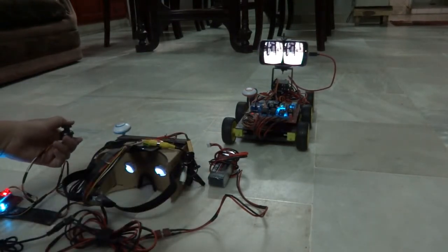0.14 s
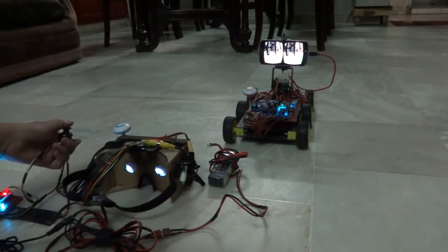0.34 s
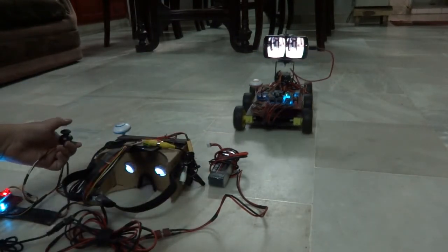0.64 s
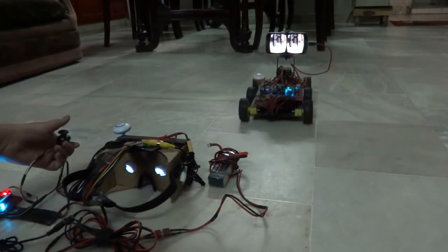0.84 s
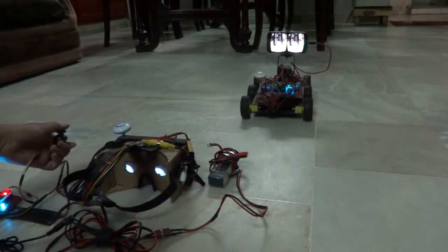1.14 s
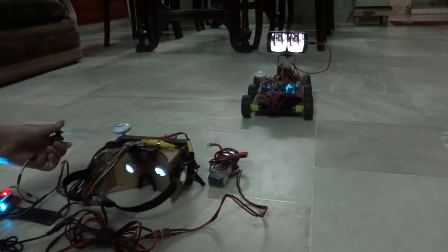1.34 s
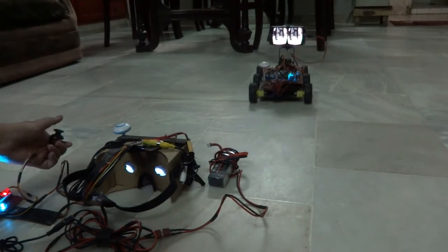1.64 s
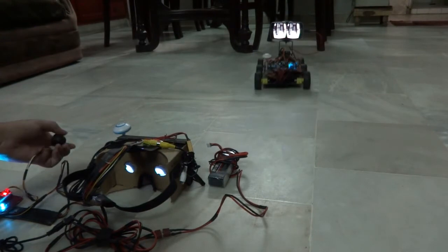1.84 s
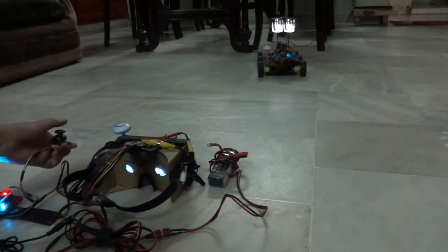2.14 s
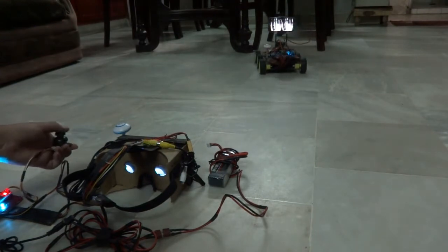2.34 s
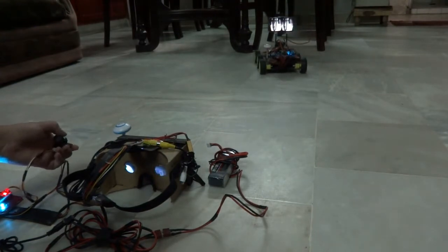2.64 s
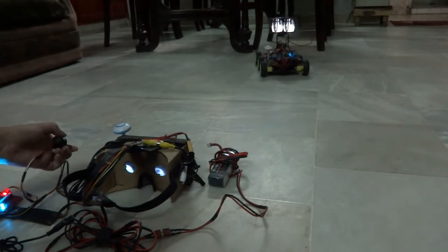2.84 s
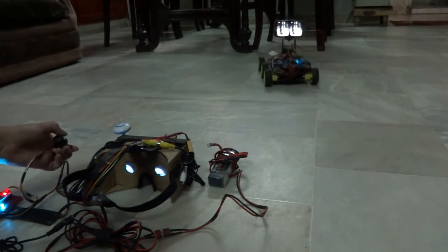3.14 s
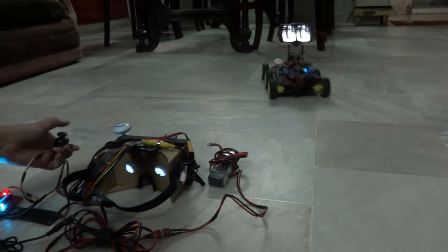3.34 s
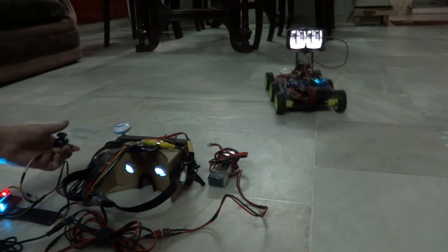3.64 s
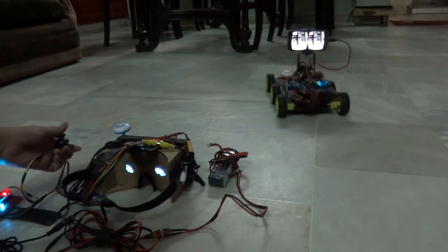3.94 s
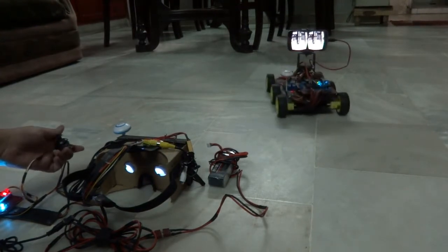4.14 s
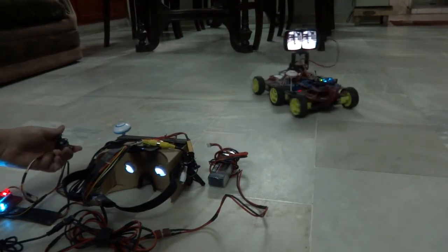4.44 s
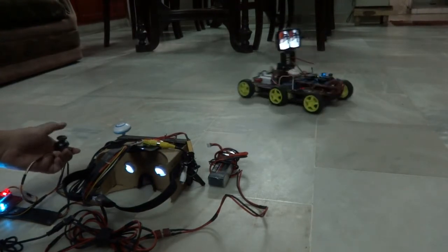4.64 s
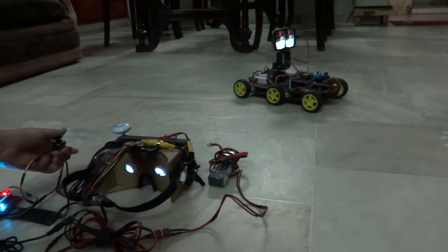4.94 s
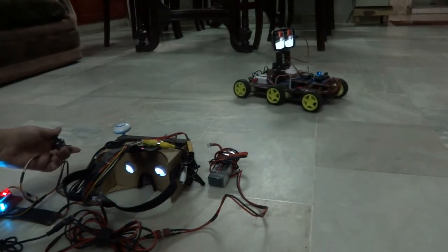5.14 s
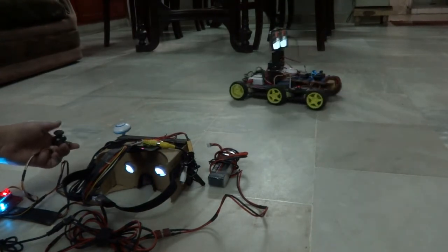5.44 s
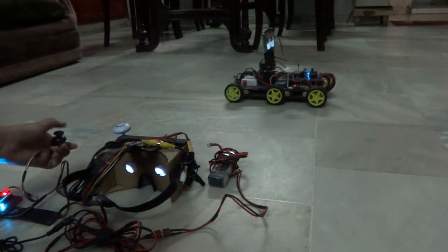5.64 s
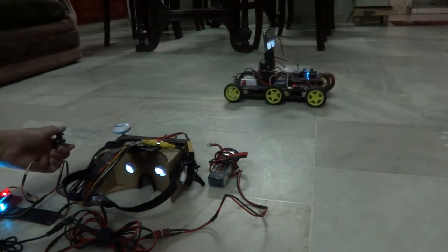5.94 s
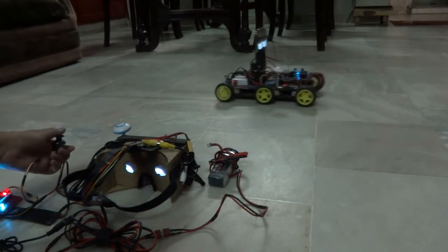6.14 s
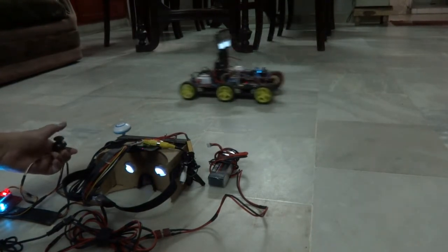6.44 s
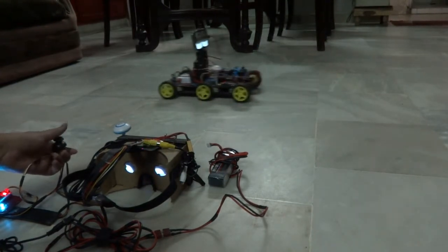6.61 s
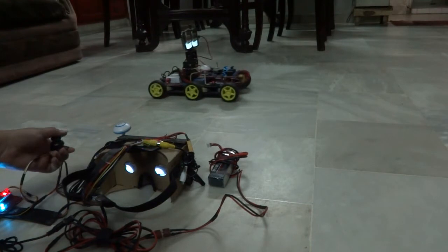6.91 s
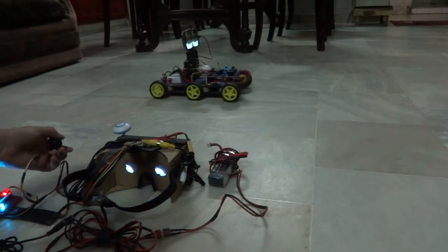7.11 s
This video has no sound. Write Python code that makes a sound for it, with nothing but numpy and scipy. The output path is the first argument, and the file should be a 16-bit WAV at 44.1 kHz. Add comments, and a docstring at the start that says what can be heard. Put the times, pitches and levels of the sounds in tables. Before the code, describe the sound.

A small robot car's plastic gear motors whir and rattle in short bursts across a stone-floored room, over steady fan rush and low wind-like microphone rumble.

```python
"""A room with a stone floor: a six-wheeled hobby robot car drives in short bursts a metre or two from a phone.
Motors spin up and coast: plastic teeth are impact trains shaken through resonances, with whines at
multiples of shaft speed; brushes are coloured noise with a whistle. Ticks are ringing clicks, a servo hums.
Steady fan-like noise fills the room; a draught buffets the microphone as low noise and short swings."""
import sys
import numpy as np
from scipy import signal
from scipy.fft import rfft, irfft
from scipy.io import wavfile
from scipy.ndimage import uniform_filter1d

SR = 44100
rng = np.random.default_rng(int(sys.argv[2]) if len(sys.argv) > 2 else 0)


def transcribe(u):
    """Save the signal u as a 16-bit wav file named by the first command-line argument.

    u: samples, shape (n,) or (channels, n), limited to [-1, 1]; the rate is SR.
    q: integer samples, one column per channel.
    """
    v = np.clip(np.atleast_2d(u).T, -1, 1)
    q = np.round(v * 32767).astype(np.int16)
    wavfile.write(sys.argv[1], SR, q)


N = 320607
T = np.arange(N) / SR


def undb(db):
    """Decibels to gain."""
    return 10 ** (np.asarray(db) / 20)


def unit(x):
    """Scale to rms 1."""
    return x / np.sqrt(np.mean(x ** 2))


def noise():
    """White noise, rms near 1."""
    return rng.standard_normal(N)


def curves(table):
    """One value per sample for each column of a timed table."""
    time_s, *columns = np.transpose(table)
    return [np.interp(T, time_s, column) for column in columns]


def colour(x, points):
    """Filter by a spectrum in dB, interpolated over log frequency; rms 1."""
    point_hz, point_db = np.transpose(points)
    bin_hz = np.maximum(np.fft.rfftfreq(N, 1 / SR), 1)
    gain = undb(np.interp(np.log(bin_hz), np.log(point_hz), point_db))
    return unit(irfft(rfft(x) * gain, N))


def resonate(x, hz, width_hz):
    """Two-pole resonance, gain 1 at the centre."""
    b, a = signal.iirpeak(min(hz, SR / 2 - 1), hz / width_hz, fs=SR)
    return signal.lfilter(b, a, x)


def resonate_twice(x, hz, width_hz):
    """Two equal resonances in series: steeper skirts, slower onset."""
    return resonate(resonate(x, hz, width_hz), hz, width_hz)


def lowpass(x, order, hz):
    """Butterworth low-pass."""
    return signal.sosfilt(signal.butter(order, hz, fs=SR, output="sos"), x)


def highpass(x, order, hz):
    """Butterworth high-pass."""
    return signal.sosfilt(signal.butter(order, hz, "high", fs=SR, output="sos"), x)


def lag(x, seconds):
    """Follow x with a first-order delay."""
    k = 1 - np.exp(-1 / (seconds * SR))
    return signal.lfilter([k], [1, k - 1], x)


def walk(steps_per_s):
    """Smooth random wander, rms 1."""
    k = int(SR / steps_per_s)
    steps = np.repeat(rng.standard_normal(N // k + 1), k)
    return unit(uniform_filter1d(uniform_filter1d(steps, k), k)[:N])


def stereo(mid, side):
    """Left and right from mid and side."""
    return np.array([mid + side, mid - side])


def rush():
    """Broadband air noise plus noise-driven broad resonances."""
    # hz, level_db per Hz (before the high-pass)
    air_spectrum = [(18, -34), (30, 12), (124, -8.5), (393, -10), (425, -6.5), (460, -11.5), (582, -12),
                    (647, -15), (841, -8.5), (1150, -14.5), (1350, -12), (1460, -16), (3380, -25.5),
                    (5010, -38.5), (15900, -67)]
    # hz, width_hz, level_db
    air_peaks = [(353, 30, -40.5), (418, 163, -38.5), (801, 54, -40), (845, 27, -43), (913, 66, -39.5),
                 (1270, 180, -43.5)]
    air = unit(highpass(colour(noise(), air_spectrum), 2, 240))
    peaks = 0
    for hz, width_hz, db in air_peaks:
        # two passes narrow the band, so each is wider
        peaks = peaks + undb(db) * unit(resonate_twice(noise(), hz, 1.7 * width_hz))
    return undb(-31.0) * air + undb(-1.5) * peaks


def fan(side_db=-16.0, hum_db=-39.5):
    """Steady fan-like rush, weaker in the side signal, over a low noisy hum common to both channels."""
    mid = rush() * undb(.5 * walk(7.1))
    hum = undb(hum_db) * unit(resonate(noise(), hz=94, width_hz=36))
    return stereo(mid, undb(side_db) * rush()) + hum


def eddies(cycles=1.0, scatter_s=0.00878, rise_s=.013):
    """Each buffet is a short cluster of low swings around its centre pitch and an octave or so either side."""
    # start_s, level_db, centre_hz
    buffets = [(0.092, -15, 121), (0.338, -18, 123), (0.392, -21.5, 130), (0.648, -23.5, 156),
               (0.885, -25.5, 123), (0.96, -17.5, 153), (1.156, -26, 183), (1.24, -25, 120.8),
               (1.394, -24.5, 238), (1.764, -24, 122), (1.799, -22, 139), (2.273, -24, 155),
               (2.503, -20, 250), (2.965, -15, 121), (3.139, -20, 140.7), (3.239, -21, 133),
               (3.329, -22.5, 120.7), (3.885, -17.5, 167), (3.939, -19, 156), (4.113, -25, 146),
               (4.738, -23.5, 151.4), (4.821, -20, 121.2), (4.909, -20, 124.4), (5.372, -20, 143),
               (5.647, -20, 170.5), (5.952, -19, 137.3), (6.576, -22, 134.7), (6.751, -19, 124),
               (6.849, -24, 126), (6.899, -19, 130), (7.122, -21, 156.1)]
    # pitch ratio, gain
    swings = [(.4, 0.37), (.6, 0.51), (.85, 1), (1.2, 0.76), (1.6, 0.79), (2.1, 1)]
    out = np.zeros(N + SR)
    t = np.arange(-SR // 12, SR // 12) / SR
    for start_s, db, hz in buffets:
        thump = 0
        for ratio, gain in swings:
            age_cycles = (t - scatter_s * rng.standard_normal()) * hz * ratio
            swing = np.cos(2 * np.pi * (age_cycles + rng.random()))
            thump = thump + gain * np.exp(-(age_cycles / cycles) ** 2) * swing
        i = max(int((start_s + rise_s + t[0]) * SR), 0)
        out[i:i + len(t)] += undb(db) * thump / np.abs(thump).max()
    return out[:N]


def draught(gust_db=-3.5, buffet_db=3.5, gust_side_db=-3, buffet_side_db=2, wander_db=3.5):
    """Air rumbles on the microphone ports; large eddies reach both alike, small ones differ."""
    # time_s, level_db
    wind = [(0, -35), (1.28, -31.5), (1.52, -37.5), (1.8, -38), (2.05, -41), (2.38, -43), (2.6, -32.5),
            (2.85, -35), (3.2, -25.5), (3.6, -32), (3.92, -31.5), (4.25, -36.5), (4.85, -31), (5.1, -42),
            (5.35, -33), (6.5, -37), (6.88, -28), (7.27, -34)]
    # hz, level_db per Hz
    large_spectrum = [(18, -72), (30, 2.5), (55, -2.5), (110, -1.5), (170, -2), (260, -12.5), (400, -21),
                      (800, -69.5)]
    small_spectrum = [(25, -2), (70, 15.5), (140, 20.0), (260, 12.5), (380, 9.5), (700, -78)]
    (wind_db,) = curves(wind)
    gust = undb(wind_db + gust_db + wander_db * walk(25))
    large = colour(noise(), large_spectrum)
    small = colour(noise(), small_spectrum)
    mid = gust * large + undb(buffet_db) * eddies()
    side = undb(gust_side_db) * gust * small + undb(buffet_side_db) * highpass(eddies(), 1, 120)
    return stereo(mid, side)


def drive(unload_s=0.067, head_start_s=.034):
    """Powered shafts close in on full speed, straining less; let go, friction slows them evenly to a stop."""
    # one row per joystick push: start_s, held_s, full_shaft_hz, spin_up_s (time constant),
    # coast_s (from full speed), level_db, load_groan_db, brush_spark_db
    runs = [(.305, .325, 181, .11, .52, -0.15, -1.5, 0.5), (1.303, 0.57, 179, .077, .38, -1, 0, -.6),
            (1.98, .11, 178.8, 0.079, 0.39, -4, -1, -3.5), (2.603, .735, 173.7, 0.069, .95, -2, -2.2, -0.9),
            (4.212, 0.43, 173.1, 0.076, 0.26, -1.2, 1.5, 0.9),
            (5.264, .27, 177, .088, 0.22, 0.64, 0.9, 1.5), (5.986, .467, 176.6, .062, .55, 0, .5, .5),
            (7.106, 0.29, 175.7, 0.08, 0.28, 1.5, 0, 1)]
    # level_db at full speed, growth_db per tenfold speed, coasting_change_db, full_strain_extra_db
    gear_law = (-25, 50, -8.5, 0)
    brush_law = (-32, 52.5, -9.5, -8)
    groan_law = (-30.5, 38, -1, 14.5)
    pace, full_hz, level_db, load_db, spark_db, coasting = np.zeros((6, N))
    for start_s, held_s, hz, spin_s, coast_s, db, load, spark in runs:
        i = int(start_s * SR)
        age_s = T[i:] - T[i]
        pushed_s = np.minimum(age_s, held_s)
        let_go_s = np.maximum(age_s - held_s, 0)
        # slack in the gears gives the shafts a head start
        rise = 1 - (1 - pace[i]) * np.exp(-(pushed_s + head_start_s) / spin_s)
        pace[i:] = rise * np.maximum(1 - let_go_s / coast_s, 0)
        # the teeth lose their load when the power is cut
        coasting[i:] = 1 - np.exp(-let_go_s / unload_s)
        full_hz[i:], level_db[i:], load_db[i:], spark_db[i:] = hz, db, load, spark
    pace = np.maximum(pace, .01)
    strain = (1 - pace) * (1 - coasting)

    def law_db(law):
        full_db, growth_db, coasting_db, strain_db = law
        return level_db + full_db + growth_db * np.log10(pace) + coasting_db * coasting + strain_db * strain

    speed_hz = np.maximum(pace * full_hz, 10)
    return speed_hz, law_db(gear_law), law_db(brush_law) + spark_db, law_db(groan_law) + load_db


def impacts(cycles, slack_cycles, scatter_db):
    """A click of random size near each whole cycle, early or late by the slack, shared between two samples."""
    beats = np.arange(np.ceil(cycles[-1]))
    timing, strength = rng.standard_normal((2, len(beats)))
    at = np.interp(beats + slack_cycles * timing, cycles, np.arange(N))
    size = undb(scatter_db * np.clip(strength, -2, 2))
    i, late = at.astype(int), at % 1
    first = np.bincount(i, size * (1 - late), N + 1)
    second = np.bincount(i + 1, size * late, N + 1)
    return (first + second)[:N]


def gears(speed_hz, wobble=.009, backlash=0.11, loose_db=2, runout=0.22, pinion_teeth=8):
    """Pinion teeth strike in step with each shaft; the slack gears behind them clatter out of step."""
    # six rows: speed ratio to the first motor, level_db
    motors = [(1, 9.5), (1.018, -13), (.875, 8.5), (.975, -2), (0.84, -3), (.83, -2)]
    mesh, clatter = 0, 0
    for ratio, db in motors:
        turns = np.cumsum(speed_hz * ratio * (1 + wobble * walk(30))) / SR
        # an off-centre pinion presses harder once a turn
        press = undb(db) * (1 + runout * np.sin(2 * np.pi * turns))
        mesh = mesh + press * impacts(pinion_teeth * turns, backlash, scatter_db=2.5)
        clatter = clatter + press * impacts(pinion_teeth * turns, slack_cycles=2, scatter_db=5.5)
    teeth = highpass(unit(mesh) + undb(loose_db) * unit(clatter), 2, 400)
    # slower teeth come more seldom, so each carries more of the level
    return unit(teeth / np.sqrt(np.maximum(speed_hz / speed_hz.max(), .25)))


def whine(speed_hz, order, width_hz):
    """A line at a multiple of the shaft speed, blurred by uneven running."""
    phase = 2 * np.pi * order * np.cumsum(speed_hz) / SR
    return walk(width_hz) * np.cos(phase) + walk(width_hz) * np.sin(phase)


def gear_rattle(teeth, speed_hz, flat_out, box_db=1.26):
    """Tooth impacts ring gearbox and chassis; mesh whines emerge with speed."""
    # hz, width_hz, level_db
    resonances = [(2493, 220, 0.5), (3006, 145, 1.5), (3237, 364, 0.5), (3970, 330, -0.5), (4305, 395, -1),
                  (4896, 470, -1.5), (6940, 2060, -16)]
    # multiple of shaft speed, width_hz, level_db
    mesh_lines = [(14.25, 75, -10.5), (16.4, 100, -7), (18.7, 110, -18)]
    box, sign = 0, 1
    for hz, width_hz, db in resonances:
        box = box + sign * undb(db) * resonate(teeth, hz, width_hz)
        sign = -sign  # neighbours in opposite polarity
    mesh_whine = sum(undb(db) * whine(speed_hz, order, width_hz) for order, width_hz, db in mesh_lines)
    return undb(box_db) * unit(box) + flat_out * mesh_whine


def load_groan(speed_hz, teeth_db=0.5, labour_db=-4.5, lag_s=.06):
    """Loose teeth groan; the most heavily loaded motor gathers speed late, a rough whine behind the others."""
    # hz, level_db per Hz
    groan_spectrum = [(500, -7), (900, 3.5), (1250, 7), (1600, 4), (2000, 5.5), (2400, -8.5), (2900, 3),
                      (4500, -15)]
    labour = undb(labour_db) * whine(lag(speed_hz, lag_s), order=13, width_hz=260)
    return undb(teeth_db) * colour(gears(speed_hz, loose_db=11.0), groan_spectrum) + labour


def brush_noise(teeth, speed_hz, flat_out, hiss_db=2.0, commutations=6):
    """Brushes spark at each commutator gap: hiss, and a whistle on high multiples of that rate."""
    # hz, level_db per Hz
    hiss_spectrum = [(3000, -27), (5000, 4), (6000, 0), (7200, -0.5), (8500, -0.5), (9700, -2.5),
                     (11000, -7), (12700, -5), (14000, -4), (15500, -3.5)]
    # multiple of commutation rate, level_db
    whistle_lines = [(11, -15.5), (12, -13), (13, -18), (14, -17)]
    sparks = unit(teeth) + undb(11) * noise()
    whistle = sum(undb(db) * whine(speed_hz, commutations * k, width_hz=90) for k, db in whistle_lines)
    return undb(hiss_db) * colour(sparks, hiss_spectrum) + flat_out * whistle


def car():
    """Gear rattle, load groan and brush noise, each at its own level law of speed, load and coasting."""
    speed_hz, gear_db, brush_db, groan_db = drive()
    flat_out = (speed_hz / speed_hz.max()) ** 4
    teeth = gears(speed_hz)
    rattle = undb(gear_db) * gear_rattle(teeth, speed_hz, flat_out)
    groan = undb(groan_db) * load_groan(speed_hz)
    brushes = undb(brush_db) * brush_noise(teeth, speed_hz, flat_out)
    # the drive's loudness wavers quickly and slightly at random
    waver = undb(1.3 * walk(75))
    return waver * (rattle + groan + brushes)


def ticks(crack=.045, gain_db=1):
    """Hard plastic snaps: a crack and a ring of a few cycles."""
    # start_s, level_db, centre_hz, width_hz (of each of two passes)
    snaps = [(2.5349, -29, 6820, 4500), (3.565, -21, 4520, 2000), (3.629, -17, 4750, 1400),
             (3.7035, -13, 4370, 1600), (3.73, -18, 6010, 6010), (3.796, -19.5, 4460, 3520),
             (4.1366, -13, 5600, 4850), (5.189, -30, 7030, 5000), (6.743, -23, 7080, 6000),
             (6.854, -25.5, 6140, 6040)]
    out, push = np.zeros(N), signal.unit_impulse(512)
    for start_s, db, hz, width_hz in snaps:
        ring = resonate_twice(push, hz, width_hz)
        i = int(start_s * SR)
        out[i:i + len(push)] += undb(db + gain_db) * (ring / np.abs(ring).max() + crack * push)
    return out


def servo(hz=608):
    """A faint, slightly unsteady sine, likely the servo that swivels the camera mast."""
    # time_s, level_db
    servo_level = [(5.8, -80), (5.95, -43), (6.55, -41.5), (6.7, -78)]
    (level_db,) = curves(servo_level)
    cycles = np.cumsum(hz * (1 + 0.0089 * walk(20))) / SR
    return undb(level_db + 2 * walk(15)) * unit(np.sin(2 * np.pi * cycles))


def room(x, t60_s=0.59, direct_db=-2.27, wet_db=-5, side_db=-10.0, pan_db=-1.0, count=6):
    """Floor and walls ring on; the echo pattern keeps changing as the car moves, nearly alike at both ports."""
    t = T[:SR // 2]
    mid, side = 0, 0
    place = T / .03  # crossfade to the next echo pattern every 30 ms, in a cycle
    for k in range(count):
        share = np.maximum(1 - np.abs((place - k + 1) % count - 1), 0)
        tails = rng.standard_normal((2, len(t))) * undb(-60 * t / t60_s) * (t > .004)
        near, far = (signal.oaconvolve(x * share, h / np.linalg.norm(h))[:N] for h in tails)
        mid, side = mid + near, side + far
    mid = undb(direct_db) * x + undb(wet_db) * lowpass(mid, 1, 15000)
    side = undb(wet_db + side_db) * lowpass(side, 3, 6500)
    pan = undb(np.array([[pan_db], [-pan_db]]) / 2)
    return stereo(mid, side) * pan


def scene(hiss_db=-66, gain_db=0.31):
    """The car in the room, over fan noise, draught and the microphone's own faint hiss."""
    background = fan() + draught() + undb(hiss_db) * noise()
    return undb(gain_db) * (background + room(car() + ticks() + servo()))


def record(dry, duck_db=-20, duck_s=0.015, top_hz=15750):
    """The phone turns its gain down for a moment when the bass surges, and cuts the deepest bass and the top."""
    bass = lowpass(dry.mean(axis=0), 2, 300)
    ducked = dry / np.sqrt(1 + lag(bass ** 2, duck_s) / undb(duck_db) ** 2)
    top_cut = signal.ellip(10, .2, 70, top_hz, fs=SR, output="sos")
    return signal.sosfilt(top_cut, highpass(ducked, 2, 20))


dry = scene()
out = record(dry)
transcribe(out)
```